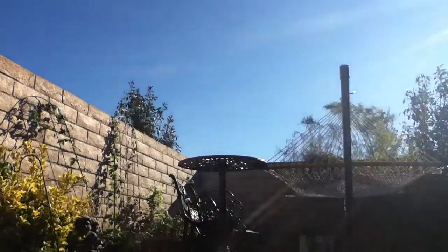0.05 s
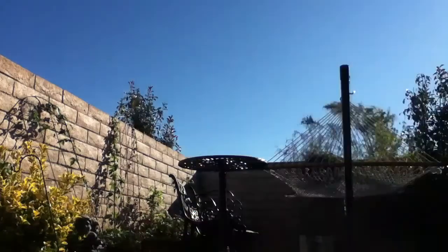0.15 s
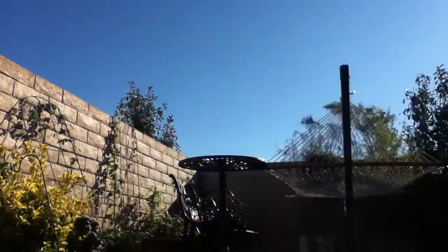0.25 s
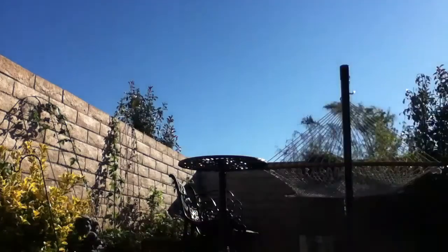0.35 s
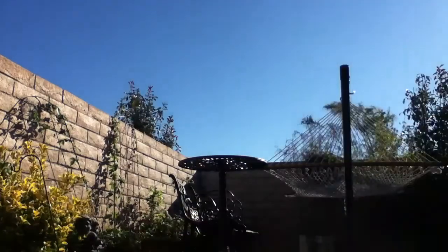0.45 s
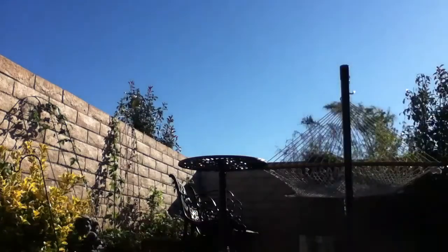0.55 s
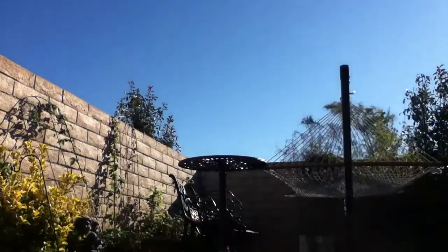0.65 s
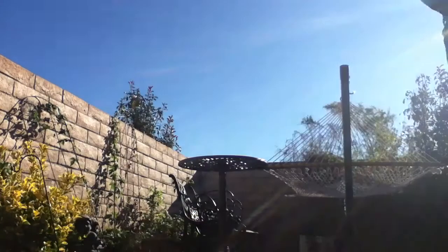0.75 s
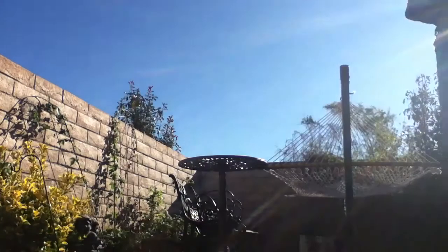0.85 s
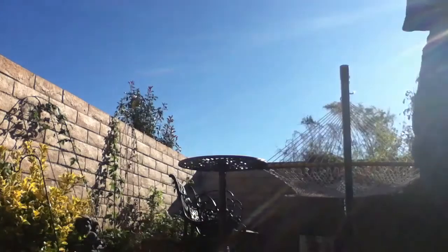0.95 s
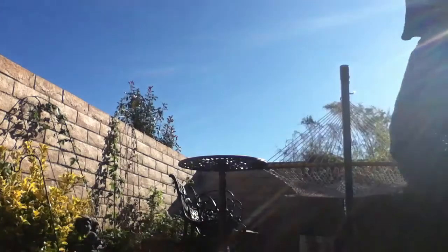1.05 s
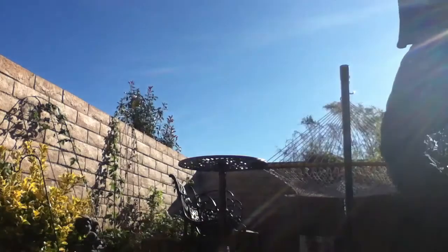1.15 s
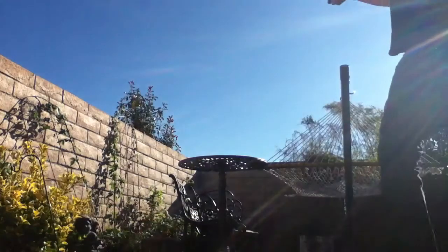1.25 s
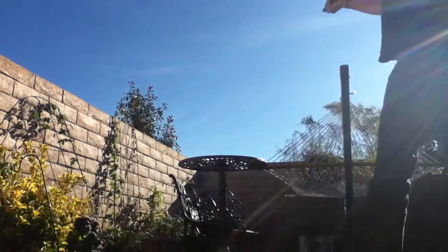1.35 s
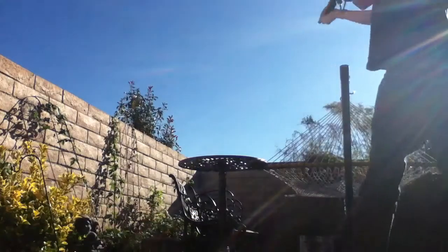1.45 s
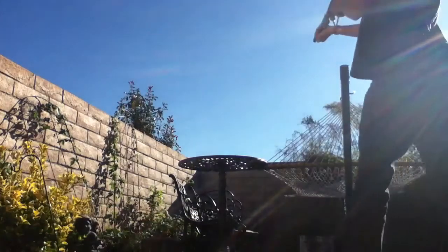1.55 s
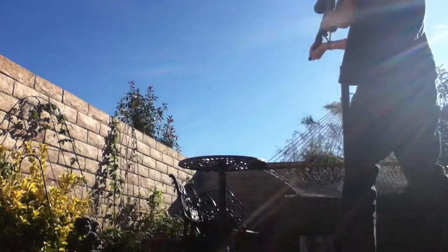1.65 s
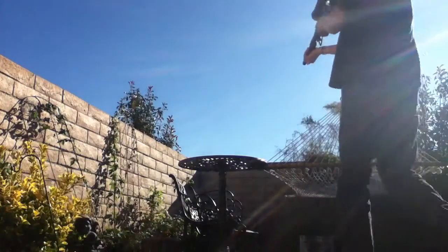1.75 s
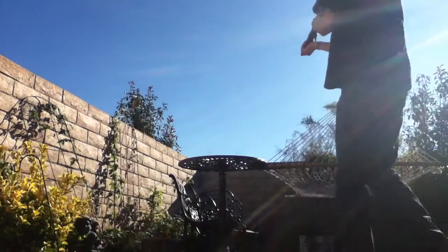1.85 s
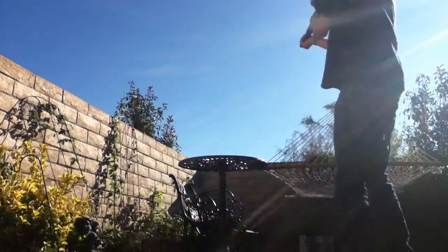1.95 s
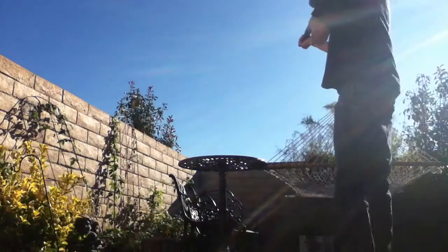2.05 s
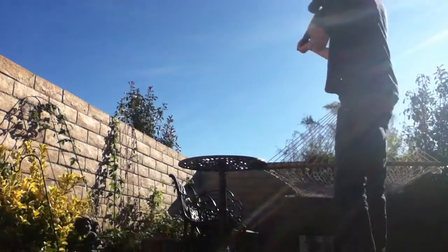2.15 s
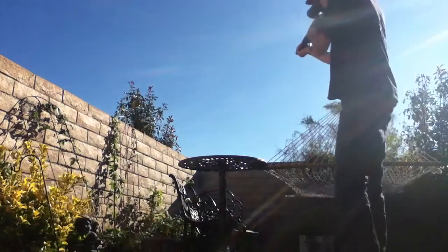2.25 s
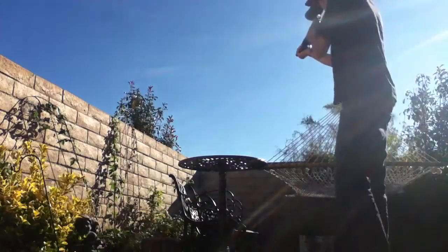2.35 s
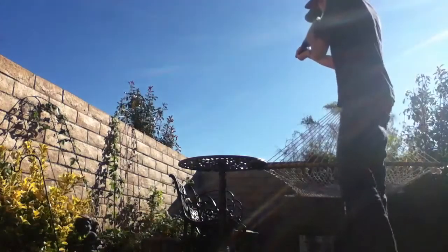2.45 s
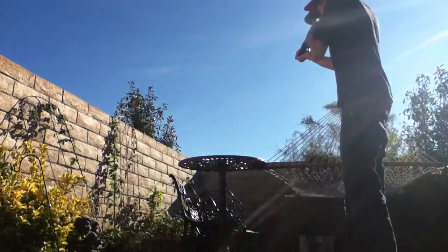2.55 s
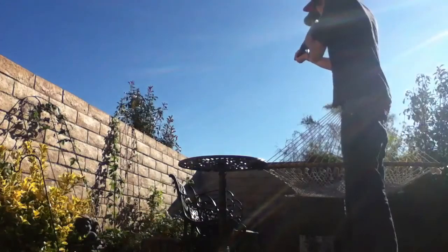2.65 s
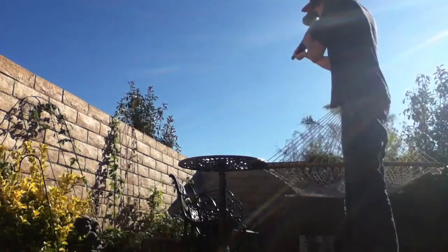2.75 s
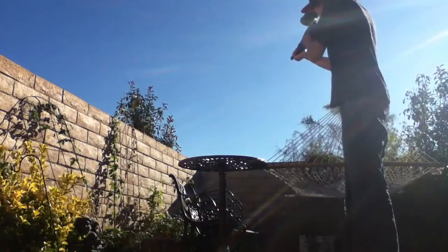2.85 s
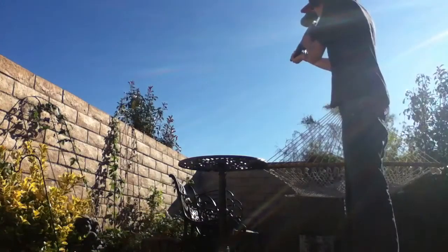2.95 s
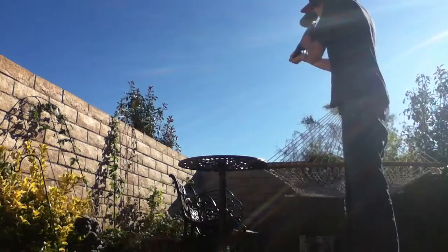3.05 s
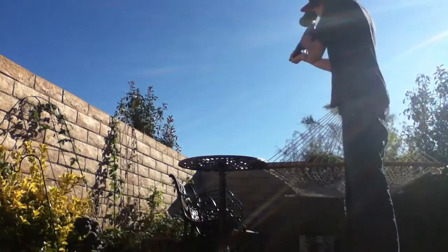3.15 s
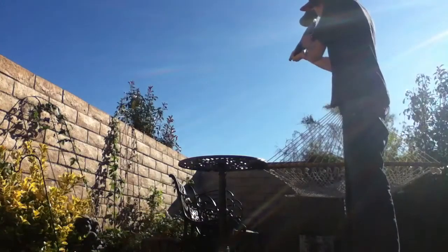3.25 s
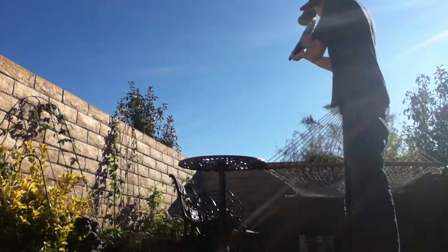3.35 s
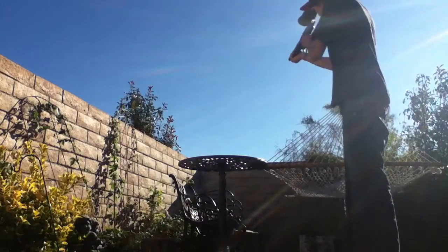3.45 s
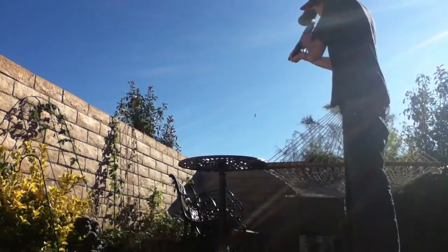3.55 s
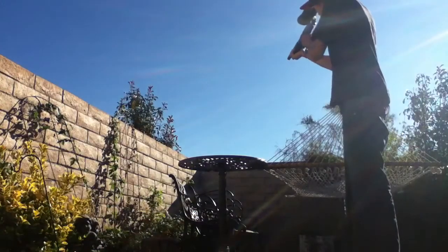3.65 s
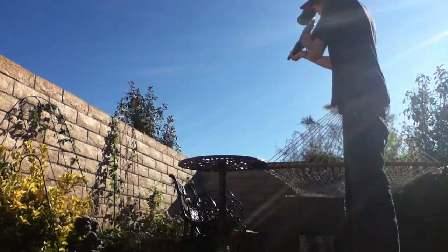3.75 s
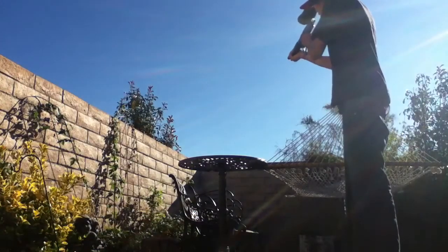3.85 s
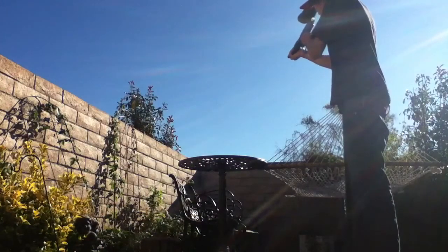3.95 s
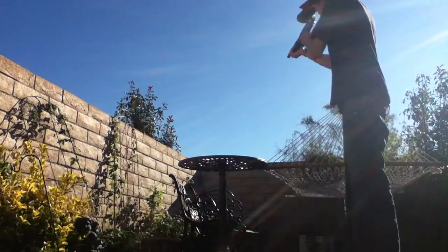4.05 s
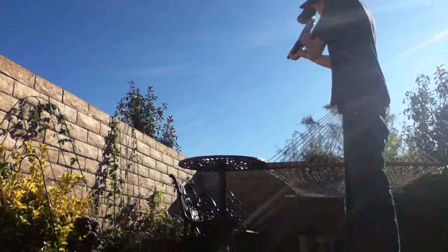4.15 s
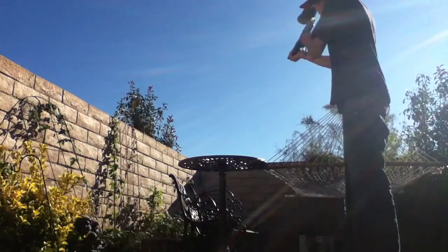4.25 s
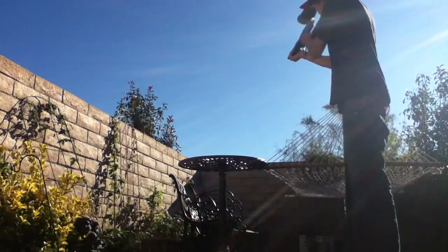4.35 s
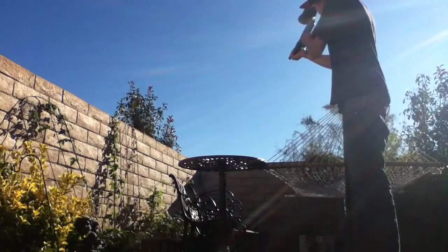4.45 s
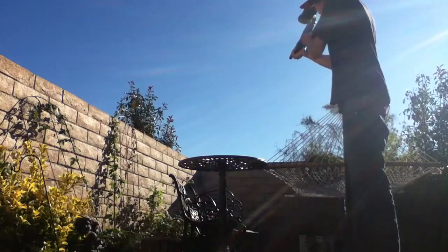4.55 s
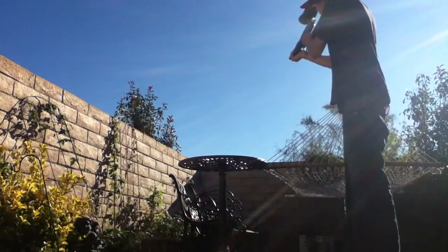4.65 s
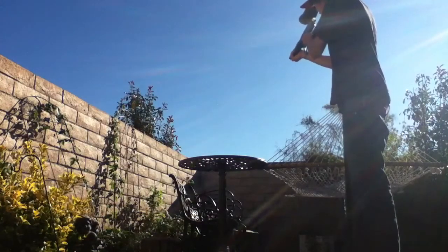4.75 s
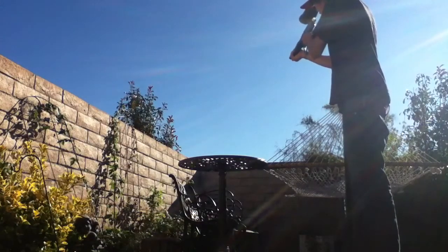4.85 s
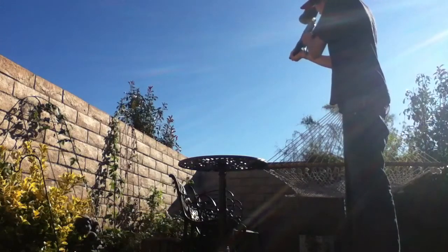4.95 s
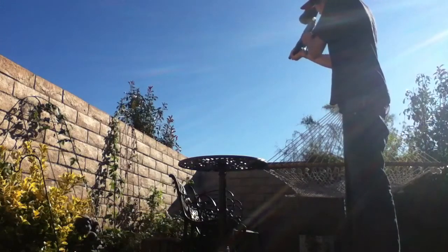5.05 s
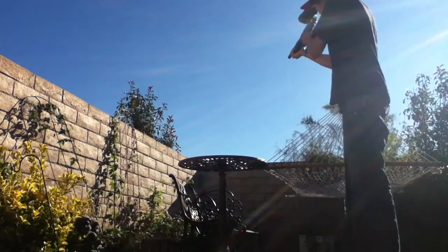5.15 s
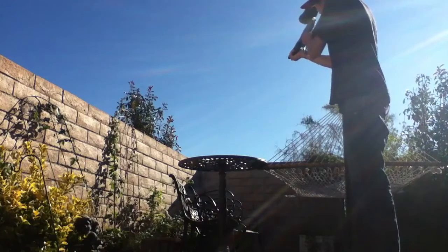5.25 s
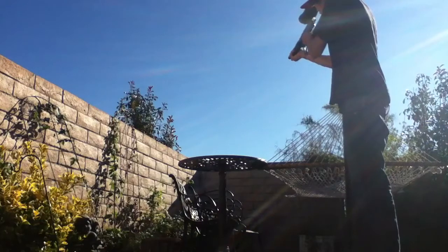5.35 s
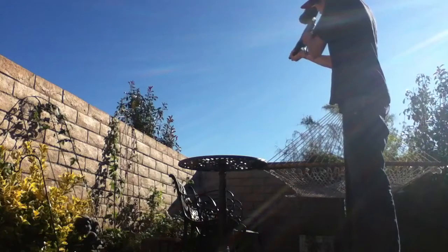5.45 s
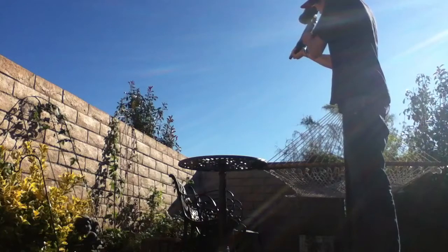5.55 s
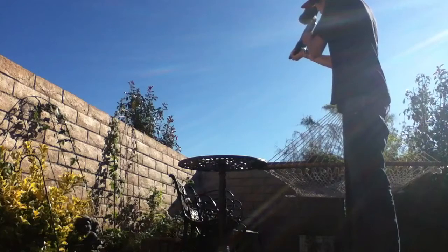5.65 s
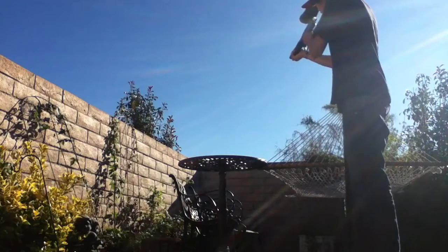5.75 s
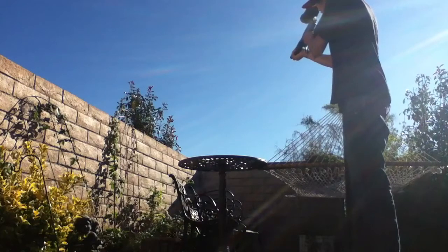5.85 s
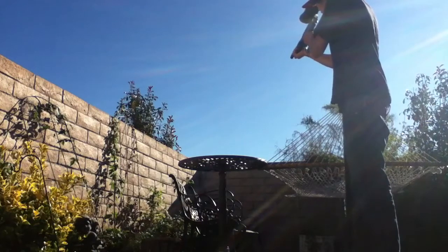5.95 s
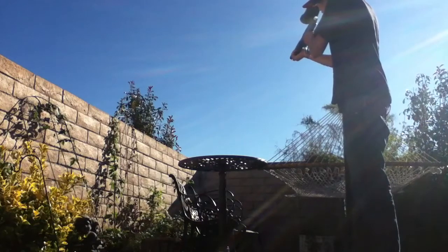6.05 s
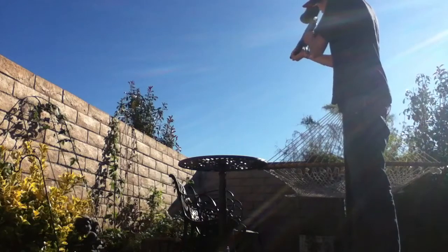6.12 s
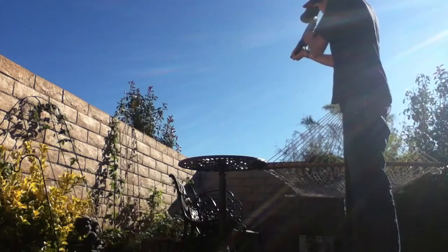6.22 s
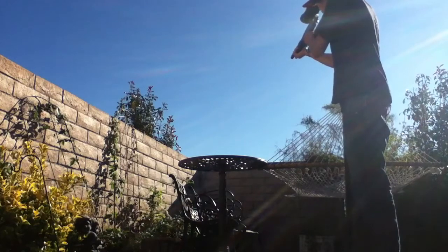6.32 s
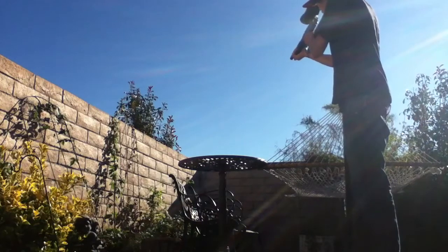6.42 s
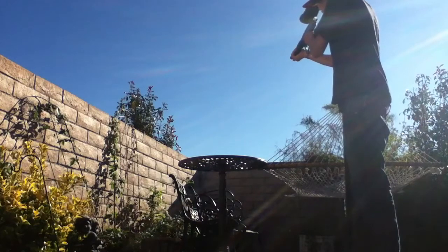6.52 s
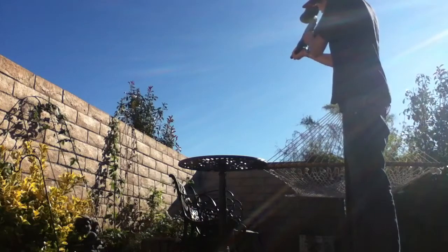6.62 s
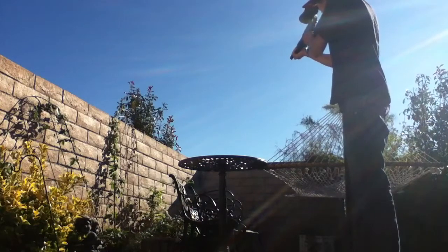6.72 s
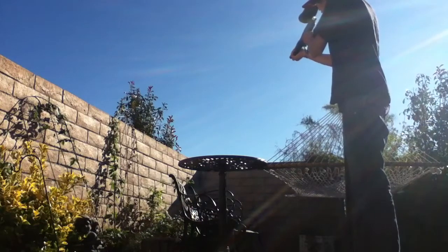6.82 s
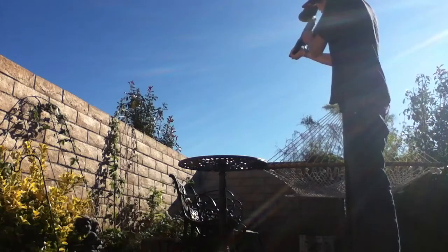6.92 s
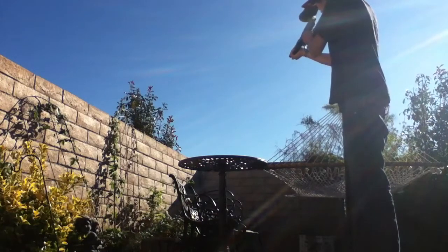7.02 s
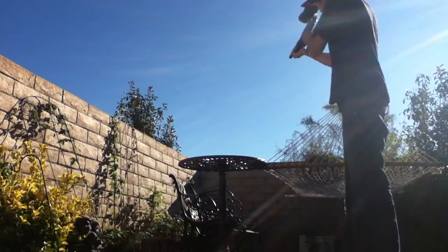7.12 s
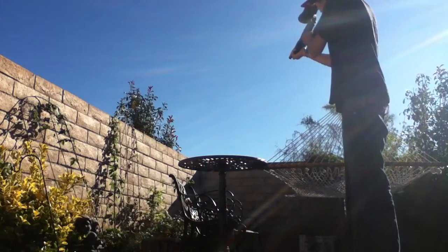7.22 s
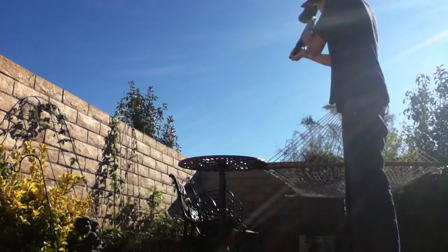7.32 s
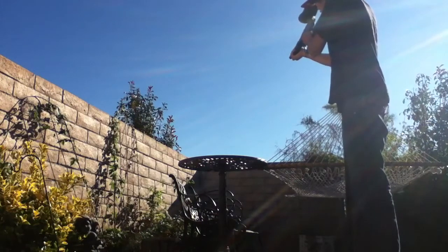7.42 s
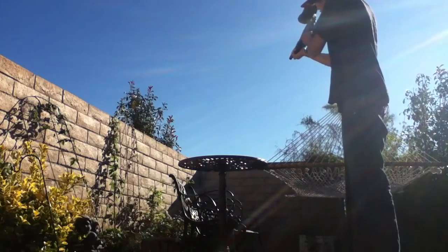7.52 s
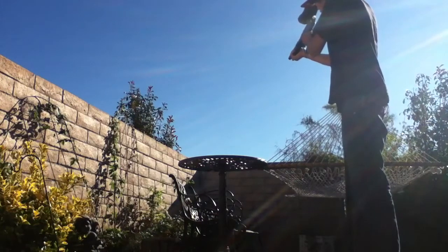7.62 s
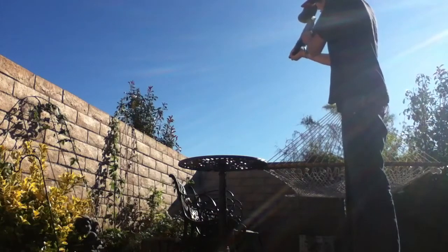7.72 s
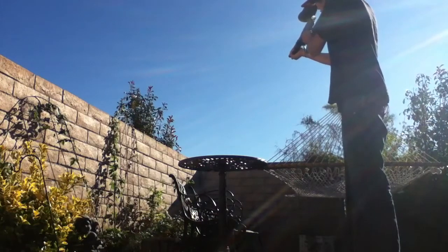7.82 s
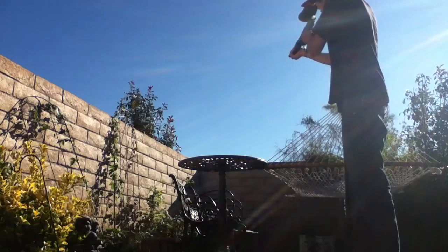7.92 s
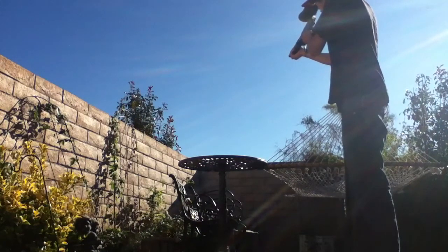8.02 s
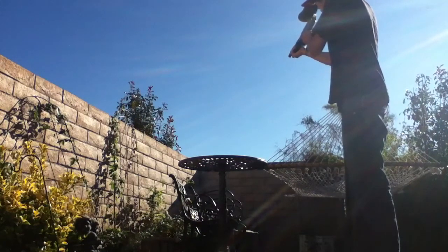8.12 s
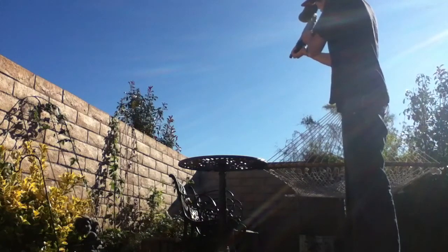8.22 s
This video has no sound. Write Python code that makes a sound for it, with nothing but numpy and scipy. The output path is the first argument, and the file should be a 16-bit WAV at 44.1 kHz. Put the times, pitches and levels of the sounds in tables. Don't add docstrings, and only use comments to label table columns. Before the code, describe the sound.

In a walled backyard, a pump-action air marker fires thirteen loud pops with metallic clacks and wet impacts, over faint traffic and motor hum.

```python
import sys
import numpy as np
from scipy import signal
from scipy.fft import rfft, irfft
from scipy.io import wavfile
from scipy.ndimage import uniform_filter1d, minimum_filter1d

SR = 44100
rng = np.random.default_rng(int(sys.argv[2]) if len(sys.argv) > 2 else 0)


def decibels_to_gain(level_db):
    exponent = np.asarray(level_db, float) / 20
    return 10 ** exponent


def int16_out(signal):
    q = np.round(np.clip(np.atleast_2d(signal).T, -1, 1) * 32767)
    wavfile.write(sys.argv[1], SR, q.astype(np.int16))


N = 365148

# start [s], level [dB].
SHOTS = [(2.534, -0.5), (3.2188, -1), (3.6599, -1.5), (4.0210, -0.5), (4.4109, -0.5), (5.0822, -2.5),
         (5.5085, -1.5), (5.9082, -1.5), (6.287, -1), (6.6618, 0), (7.0395, -1.5), (7.464, -1),
         (8.0781, -1)]
# frequency [Hz], density [dB per Hz].
SPLAT_SPECTRUM = [(1500, 1), (3000, -2), (5500, 1), (8000, -3.5), (12000, -14), (16000, -24.5)]


def unit(x):
    return x / np.sqrt(np.mean(x ** 2) + 1e-20)


def clicks(times_s, sizes):
    out = np.zeros(N)
    index = np.round(np.asarray(times_s) * SR).astype(int)
    np.add.at(out, np.clip(index, 0, N - 1), sizes)
    return out


def curve(rows, column, off_db=-90):
    rows = np.array(rows)
    return np.interp(np.arange(N) / SR, rows[:, 0], rows[:, column], off_db, off_db)


def drift(rate_hz):
    knots = rng.standard_normal(1000)
    return np.interp(np.arange(N) / SR * rate_hz, np.arange(1000), knots)


def colour(x, spectrum):
    hz, db = np.transpose(spectrum)
    bin_hz = np.maximum(np.arange(len(x) // 2 + 1) * SR / len(x), 1)
    gain_db = np.interp(np.log(bin_hz), np.log(hz), db, -80, -80)
    return irfft(rfft(x) * decibels_to_gain(gain_db), len(x))


def noise(spectrum):
    return unit(colour(rng.standard_normal(N), spectrum))


def ring(x, hz, t60_s):
    r = decibels_to_gain(-60 / (t60_s * SR))
    w = 2 * np.pi * hz / SR
    return signal.lfilter([0, np.sin(w)], [1, -2 * r * np.cos(w), r * r], x + 1e-18)


def struck(modes, times_s, db, spread_db, flips=True):
    luck = rng.standard_normal((len(times_s), 2, len(modes)))
    if flips:
        sign = np.sign(luck[:, 1])
    else:
        sign = np.ones((len(times_s), 1)) * (-1) ** np.arange(len(modes))
    out = np.zeros(N)
    for k, (hz, level_db, t60_s) in enumerate(modes):
        blow_db = db + level_db + np.clip(spread_db, 0, 3.5) * luck[:, 0, k]
        out += ring(clicks(times_s, decibels_to_gain(blow_db) * sign[:, k]), hz, t60_s)
    return out


def puff(train, rise_s, t60_s):
    a = np.exp(-1 / (rise_s * SR))
    r = decibels_to_gain(-60 / (t60_s * SR))
    fall = signal.lfilter([1], [1, -r], train + 1e-18)
    return signal.lfilter([1 - a], [1, -a], fall)


def echoed(x, echoes):
    out = x.copy()
    for s, db in echoes:
        out += decibels_to_gain(db) * np.roll(x, round(s * SR)) * (np.arange(N) >= s * SR)
    return out


def swells(t, peak_s, rise, fall, db):
    since = t - np.reshape(peak_s, (-1, 1))
    slope = np.where(since < 0, np.abs(rise)[:, None], -np.abs(fall)[:, None])
    return decibels_to_gain(db[:, None] + slope * since).sum(axis=0)


def gestures(rows):
    t = np.arange(0, N, 32) / SR
    return np.interp(np.arange(N) / SR, t, swells(t, *np.transpose(rows)))


def background():
    # frequency [Hz], rms [dB], waver [dB].
    hum_tones = [(89, -47, 1.0), (120, -58, 2.5), (178, -60, 2.5), (267, -57, 2.0), (356, -64, 2.5),
                 (445, -62, 2.0), (14992, -76, .7)]
    # start [s], level [dB].
    bump_table = [(.55, -58), (.86, -44), (.9, -38.5), (1.05, -50.5)]
    # time [s], gain [dB].
    recovery = [(0, 5.5), (.95, 5), (1.1, .5), (2.5, 3), (2.8, -0.5), (4.7, 1), (8.28, 1.5)]
    # frequency [Hz], density [dB per Hz].
    traffic_spectrum = [(25, -25), (60, -20.5), (100, -21.5), (160, -11.5), (400, -19), (1000, -17.5),
                        (1500, -26.5), (2300, -38)]
    # frequency [Hz], density [dB per Hz].
    hiss_spectrum = [(1500, -39.5), (5000, -42.5), (10000, -47), (13500, -49), (14600, -63.5), (16500, -66)]
    air_db, hiss_db = -52.5, -68
    duck_db, duck_t60_s = -4.5, 2.1
    t = np.arange(N) / SR
    hum = np.zeros(N)
    for hz, db, waver_db in hum_tones:
        level = decibels_to_gain(db - 1 + waver_db * drift(14))
        hum += level * np.sin(2 * np.pi * hz * t + 0.24 * drift(16.0))
    s, db = np.transpose(bump_table)
    bump_spectrum = [(30, 4.5), (60, 4.5), (120, -11), (250, -2)]
    bumps = puff(clicks(s, decibels_to_gain(db)), 0.0065, 0.14) * noise(bump_spectrum)
    duck = np.minimum(puff(clicks(np.array(SHOTS)[:, 0], 0.79), 0.01, duck_t60_s), 1.3)
    wash = decibels_to_gain(air_db + 0.22 * drift(1.5)) * noise(traffic_spectrum)
    wash += decibels_to_gain(hiss_db) * noise(hiss_spectrum)
    gain_db = curve(recovery, column=1, off_db=0) + duck_db * duck
    return bumps + decibels_to_gain(gain_db) * (hum + wash)


def shuffle():
    # peak [s], rise [dB/s], fall [dB/s], level [dB].
    scuff_table = [(.26, 45, 250, -49), (.348, 250, 352, -43.5), (1.906, 176, 119, -36),
                   (2.196, 131, 40, -41.5)]
    # peak [s], rise [dB/s], fall [dB/s], level [dB].
    rustle_table = [(.26, 55, 140, -53), (.5, 160, 200, -62), (1.824, 900, 350, -52.5),
                    (1.906, 600, 118, -63.5), (2.196, 200, 74, -57)]
    grit = decibels_to_gain(2.2 * drift(110))
    scuff = noise([(300, -6), (700, 2.0), (1300, 3.5), (1900, -13.0), (3000, -19.0), (5000, -28.5)])
    cloth = noise([(1800, -6.5), (3000, 5.5), (6000, 6), (12000, 1.5), (16000, -10.5)])
    scuffs = grit * gestures(scuff_table) * scuff
    return scuffs + decibels_to_gain(3.3 * drift(60)) * gestures(rustle_table) * cloth


def hopper():
    # frequency [Hz], level [dB], t60 [s].
    shell_modes = [(574, -21, 0.03), (665, -7.5, 0.076), (761.4, -2.5, 0.067), (1070, -15, .03),
                   (1382, -1.5, 0.011), (1780, -19, 0.024), (2960, -14, 0.0099), (4920, -17.5, 0.0081)]
    # start [s], peak [dB], tick relative to it [dB].
    knock_table = [(0.322, -34, -14), (0.341, -29, -22), (0.365, -29, -22), (0.416, -29, -21),
                   (0.47, -28, -15), (0.535, -21, -18), (0.561, -17, -11), (0.579, -15.5, -13),
                   (0.613, -18.5, -16), (0.658, -25, -26), (0.683, -19, -39), (0.705, -20.5, -22),
                   (0.747, -18, -21), (0.806, -25, -27), (0.848, -18, 3), (0.867, -21, 5),
                   (0.944, -41, -16), (0.972, -26, 4.5), (1.048, -16, 5.5), (1.163, -46, -20),
                   (1.204, -42, -19), (1.314, -31.5, -32)]
    # peak [s], rise [dB/s], fall [dB/s], level [dB].
    shake_table = [(.5, 58, 200, -46), (.564, 248, 45.5, -27), (.856, 250, 57.5, -42),
                   (1.048, 598.5, 213, -38.5), (1.238, 61.5, 395, -56)]
    tumbles_per_s = 200
    knocks = (rng.random(N) < tumbles_per_s / SR) * (np.arange(N) < 3 * SR // 2)
    sizes = decibels_to_gain(5.7 * np.minimum(rng.exponential(1, N), 3))
    at = np.flatnonzero(knocks)
    shell = struck(shell_modes, at / SR, 20 * np.log10(sizes[at]), spread_db=4.5)
    shell = shell / np.sqrt(uniform_filter1d(shell ** 2, SR // 12) + 0.02)
    wash = decibels_to_gain(-3.0) * noise([(300, -17), (760, 6.5), (1500, -1.0), (2200, -17.0), (5200, -17.5),
                              (7000, -25.5), (16000, -36.0)])
    s, db, tick_db = np.transpose(knock_table)
    heavy = struck(shell_modes, s, db - 6.5, spread_db=4.0)
    heavy = echoed(heavy, [(0.004, -1.5), (0.011, -6)])
    tick_spectrum = [(2000, -10.5), (2800, -6.5), (5000, 11.5), (7000, 5.5), (16000, -8)]
    tick = puff(clicks(s, decibels_to_gain(db + tick_db - 2.5)), 0.00018, 0.017) * noise(tick_spectrum)
    return gestures(shake_table) * (shell + wash) + heavy + tick


def ticks():
    # start [s], peak [dB], frequency [Hz], tail relative to it [dB].
    tick_table = [(0.595, -20.5, 4920, -26), (0.8195, -37, 6680, -10), (0.866, -20, 5840, -12.5),
                  (1.2268, -51, 3110, -20), (1.312, -47, 3140, -19), (1.71, -37, 3660, -25),
                  (1.8244, -30, 4240, -29), (1.8522, -36.5, 4670, -25), (1.8994, -40, 3320, -26),
                  (1.925, -37, 2960, -31), (1.957, -43, 3040, -24), (2.3136, -49, 4260, -22),
                  (2.3383, -39, 5500, -24), (2.3714, -43, 4250, -30), (2.4808, -53, 3980, -22),
                  (2.8275, -25.5, 6600, -15.5), (2.8429, -23, 6500, -18.5), (2.935, -31, 7500, -18),
                  (3.465, -30.5, 6230, -18), (4.5757, -27, 6430, -8), (4.6813, -28, 4600, -17.5),
                  (6.4884, -30.5, 4310, -23), (7.3017, -29.5, 4820, -18), (7.9812, -47, 4000, -25),
                  (8.0082, -61, 3090, -20)]
    # start [s], peak [dB], frequency [Hz], tail relative to it [dB].
    trigger_pull = (2.516, -31, 6000, -9)
    s, db, hz, tail_db = np.transpose(list(tick_table) + [trigger_pull])
    tones = np.zeros(N)
    for at_s, level_db, tone_hz in zip(s, db, hz):
        tones += ring(clicks([at_s], decibels_to_gain(level_db - 2.0)), tone_hz, 0.008)
    envelope = decibels_to_gain(-6.5) * puff(clicks(s, decibels_to_gain(db)), 0.0013, 0.012)
    envelope += puff(clicks(s, decibels_to_gain(db + tail_db)), 0.0038, 0.22)
    return tones + envelope * noise(SPLAT_SPECTRUM)


def clacks():
    # start [s], peak [dB], low body and sharp first strike relative to it [dB].
    clack_table = [(0.8453, -15.5, -13, -10), (0.9715, -20, -13, -16), (1.047, -13, -18.5, -6),
                   (3.0114, -12.5, -10, -3.5), (3.5505, -15.5, -9.5, -1), (3.9065, -13.5, -12.5, -1.5),
                   (4.2944, -13, -10, 0), (4.7625, -13.5, -12, -2.5), (5.3749, -15, -9, -4),
                   (5.7942, -14, -10.5, -4), (6.1791, -13.5, -9, -6), (6.581, -14, -10.5, -5),
                   (6.9329, -11, -13, -26), (7.389, -14, -13.5, -1.5), (7.7607, -12.5, -11.5, -6.5),
                   (2.8285, -31, -6, -12), (2.8435, -28, -9, -8), (2.935, -34.5, -6, -12)]
    # frequency [Hz], level [dB], t60 [s].
    steel_modes = [(4800, -19, 0.015), (5230, -9.5, 0.025), (5356, -2, 0.016), (6180, 3, 0.0028),
                   (6243, -1.5, 0.027), (7180, -11, 0.012), (9470, -12, 0.008), (10740, -15, 0.013)]
    # frequency [Hz], level [dB], t60 [s].
    grip_modes = [(661, -8.5, 0.048), (1258, 1, 0.035), (1660, 3, .01), (1955, -1, 0.034),
                  (2370, -5.5, 0.0067)]
    # frequency [Hz], level [dB], t60 [s].
    strike_modes = [(1380, -5.5, 0.0098), (2260, -9, 0.0059), (5080, -7, 0.01), (6220, 1, 0.01),
                    (9430, -14, .006), (11900, -11, 0.0073)]
    # start [s], level [dB].
    latch = (1.0478, -5)
    s, db, body_db, strike_db = np.transpose(clack_table)
    strike_s = np.r_[s + 0.0005, latch[0]]
    strike_level_db = np.r_[db + strike_db, latch[1]]
    dry = struck(steel_modes, s, db - 4.5, spread_db=2.0, flips=False)
    dry += struck(grip_modes, s + 0.00099, db + body_db - 0.5, spread_db=2.0, flips=False)
    dry += struck(strike_modes, strike_s, strike_level_db, spread_db=2.0, flips=False)
    train = clicks(s, decibels_to_gain(db))
    broad = noise([(500, 2.5), (1300, -1.0), (3000, -4.0), (6000, 0), (9000, -14.0), (15000, -18.5)])
    snap = decibels_to_gain(-8.0) * puff(train, 0.0027, 0.014) * broad
    tail = decibels_to_gain(-18.5) * puff(echoed(train, [(0.03, -14)]), 0.012, 0.13) * broad
    steel_haze = unit(ring(rng.standard_normal(N), 5790, 0.0049))
    shimmer = decibels_to_gain(-39.5) * puff(train, 0.004, 0.41) * steel_haze
    tail += decibels_to_gain(-37.5) * puff(train, 0.034, 0.44) * broad
    near_and_far = [(0.009, -11.5), (0.015, -12.5), (0.033, -16.5), (0.038, -22.5)]
    return echoed(dry + snap, near_and_far) + tail + shimmer


def splats():
    # start [s], peak [dB], knock relative to it [dB].
    splat_table = [(2.6375, -19.5, -7), (3.326, -15.5, -13), (3.7648, -17.5, -4), (4.1236, -18.5, 0),
                   (4.5145, -21.5, -1), (5.1947, -16.5, -11), (5.6117, -21.5, -5), (6.0127, -16, -9),
                   (6.3895, -19.5, -6), (6.7688, -17, -3), (7.1456, -15, -6), (7.5708, -19.5, -2.5),
                   (8.1866, -14, -12)]
    s, db, knock_db = np.transpose(splat_table)
    train = clicks(s, decibels_to_gain(db))
    envelope = decibels_to_gain(-5) * puff(train, 0.0006, 0.022) + decibels_to_gain(-20.5) * puff(train, 0.012, 0.28)
    burst = envelope * noise(SPLAT_SPECTRUM)
    wall_modes = [(768, -0.5, 0.02), (1250, -8, 0.01)]  # Hz, dB, t60 s
    knock = struck(wall_modes, s + 0.00093, db + knock_db, spread_db=6.5)
    return echoed(burst + knock, [(0.012, -6), (0.025, -12.5), (0.044, -13), (0.072, -14.5)])


def arrivals():
    # delay [s], barrel pulse [dB], crack [dB].
    paths = [
        (.0009, -9.5, -12.5),
        (.0093, -7, -7.5),
        (.0230, -12.5, -21),
        (0.032, -34, -26),
        (.0386, -8.5, -10),
        (.0510, -18, -16.5),
        (0.064, -38, -59),
    ]
    repulse_s, repulse_db, repulse_crack_db = 0.002015, 1, -10
    ground_s, ground_s_per_s = 0.0048, 0.03
    ground_db, ground_crack_db = -9.5, -4
    s, pulse_db, crack_db = np.transpose(paths)
    delay_s = np.r_[s, s + repulse_s, s + ground_s + ground_s_per_s * s]
    pulse = decibels_to_gain(np.r_[pulse_db, pulse_db + repulse_db, pulse_db + ground_db])
    crack_db = np.r_[crack_db, crack_db + repulse_crack_db, crack_db + ground_crack_db]
    return delay_s, pulse, crack_db


def blasts():
    # frequency [Hz], level [dB], t60 [s].
    barrel_modes = [(580, -4.5, 0.004), (750, -4, 0.036), (1103, -3.5, 0.011), (1530, -23, 0.0026)]
    # frequency [Hz], level [dB], t60 [s].
    muzzle_modes = [(3430, -4, 0.0025), (6650, -8.5, 0.0038), (11300, -15, 0.0029)]
    # delay [s], level [dB].
    thump_table = [(-.001, -15), (0.043, -32), (0.062, -52), (0.106, -43), (.13, -37), (0.157, -47.5)]
    # peak [s], rise [dB/s], fall [dB/s], low level [dB], high level [dB].
    scatter_table = [
        (.001, 2197, 249, -40, -23.5),
        (.006, 3500, 503, -18.5, -30.5),
        (0.049, 325, 652, -23, -29.5),
        (.07, 495, 96, -31.5, -38.5),
    ]
    # frequency [Hz], density [dB per Hz].
    low_spectrum = [(150, -7.5), (350, -11.5), (550, -1), (900, -5), (1200, 4), (1600, -6), (2200, -19.5),
                    (3000, -12)]
    # frequency [Hz], density [dB per Hz].
    high_spectrum = [(1500, 2), (2200, 1), (3500, 4), (6000, 5.5), (8000, 2.5), (11000, -2.5),
                     (14000, -12.5), (17000, -34.5)]
    valve_opens_s = 0.013
    s, db = np.transpose(SHOTS)
    delay_s, pulse, crack_db = arrivals()
    at_s = (s[:, None] + delay_s).ravel()
    size = decibels_to_gain(db)[:, None]
    wobble = decibels_to_gain(0.9 * rng.standard_normal((len(s), len(delay_s))))

    pulses = clicks(at_s, (size * pulse * wobble).ravel())
    barrel = sum(decibels_to_gain(level_db) * ring(pulses, hz, t60_s) for hz, level_db, t60_s in barrel_modes)
    barrel = signal.sosfilt(signal.butter(2, 380, "high", fs=SR, output="sos"), barrel)

    fronts = (size * decibels_to_gain(crack_db) * wobble).ravel()
    cracks = decibels_to_gain(1.5) * puff(clicks(at_s, fronts), 0.00025, 0.0043) * noise(high_spectrum)
    cracks += struck(muzzle_modes, at_s, 20 * np.log10(fronts) + 6, spread_db=3.5, flips=False)

    push_s, push_db = np.transpose(thump_table)
    pushes = clicks((s[:, None] + push_s).ravel(), (size * decibels_to_gain(push_db)).ravel())
    soft = puff(pushes, 0.00021, 0.0051)
    thump = decibels_to_gain(-65.0) * ring(ring(soft, 150.0, 0.053), 191, 0.039)

    lead_s = 0.01
    t = np.arange(SR * 3 // 5) / SR
    peak_s, rise, fall, low_db, high_db = np.transpose(scatter_table)
    opening = np.clip(1 + (t - lead_s) / valve_opens_s, 0, 1) ** 2
    low = opening * swells(t - lead_s, peak_s, rise, fall, low_db)
    high = opening * swells(t - lead_s, peak_s, rise, fall, high_db)
    train = clicks(s - lead_s, decibels_to_gain(db))
    walls = signal.fftconvolve(train, low * noise(low_spectrum)[:len(t)])[:N]
    stirred = decibels_to_gain(-22.5) * signal.fftconvolve(train, low)[:N] * noise(low_spectrum)

    hiss = noise(high_spectrum)
    dull = signal.sosfilt(signal.butter(2, 6500, fs=SR, output="sos"), hiss)
    fresh = np.exp(-t / 0.13)
    bright = dull + decibels_to_gain(2.5 * drift(90)) * (hiss - dull)
    rush = signal.fftconvolve(train, high * fresh)[:N] * bright
    rush += signal.fftconvolve(train, high * (1 - fresh))[:N] * dull
    flecks = (rng.random(N) < 90 / SR) * rng.exponential(1.2, N)
    grain = decibels_to_gain(2.93 * drift(110)) * (1 + puff(flecks, 0.0003, 0.003))
    return barrel + cracks + thump + walls + stirred + grain * rush


def scene():
    mix = blasts() + splats() + clacks() + ticks() + hopper() + shuffle() + background()
    return mix[None]


def hushed(x):
    # treble above [Hz], jump that starts it [dB], loss [dB].
    hush_table = [(2570, 24.5, -10.5), (8900, 9, -21)]
    ahead = round(0.012 * SR)
    power = uniform_filter1d(np.diff(x, prepend=0) ** 2, size=128)
    level_db = 10 * np.log10(power + 1e-12)
    coming_db = -minimum_filter1d(-level_db, ahead, origin=-(ahead // 2))
    jump_db = coming_db - level_db
    for hz, start_db, loss_db in hush_table:
        bass = signal.sosfiltfilt(signal.butter(3, hz, fs=SR, output="sos"), x)
        x = bass + (x - bass) * decibels_to_gain(loss_db * np.clip((jump_db - start_db) / 10.0, 0, 1))
    return x


def top_cut(x):
    return signal.sosfilt(signal.butter(12, 16800, fs=SR, output="sos"), x)


def record(dry):
    rounded = 0.78 * np.tanh(dry / 0.78)
    thin = signal.sosfilt(signal.butter(2, 60, "high", fs=SR, output="sos"), rounded)
    thin = signal.sosfilt(signal.cheby2(10, 60, 17000, fs=SR, output="sos"), thin)
    return top_cut(hushed(thin))


dry = scene()
out = record(dry)
int16_out(out)
```